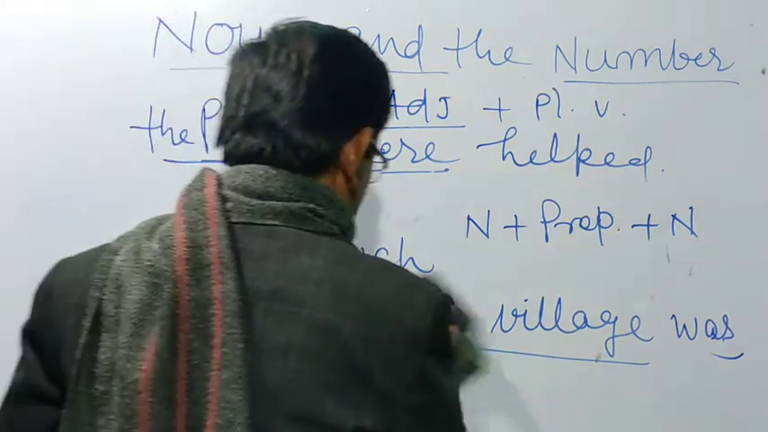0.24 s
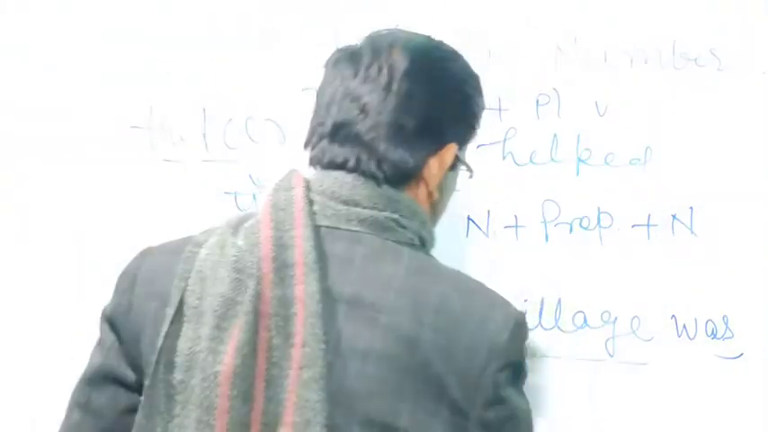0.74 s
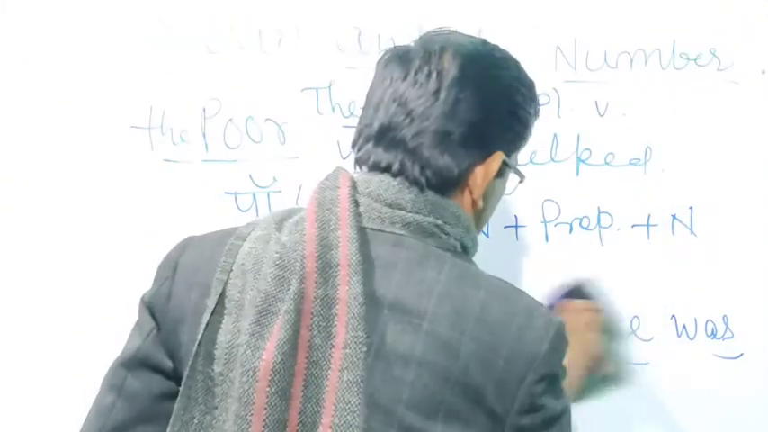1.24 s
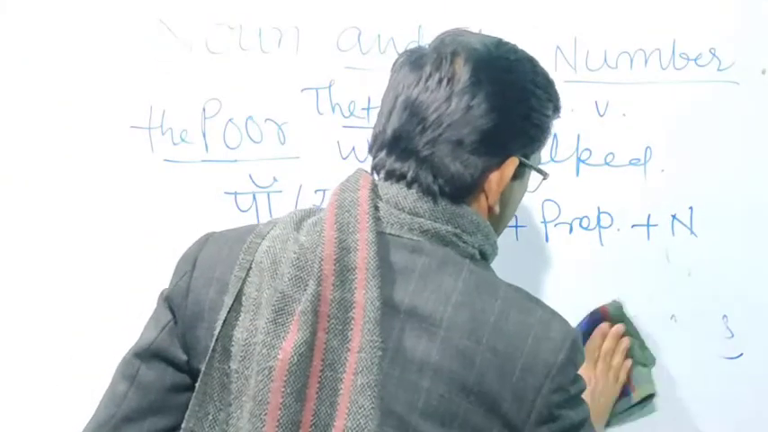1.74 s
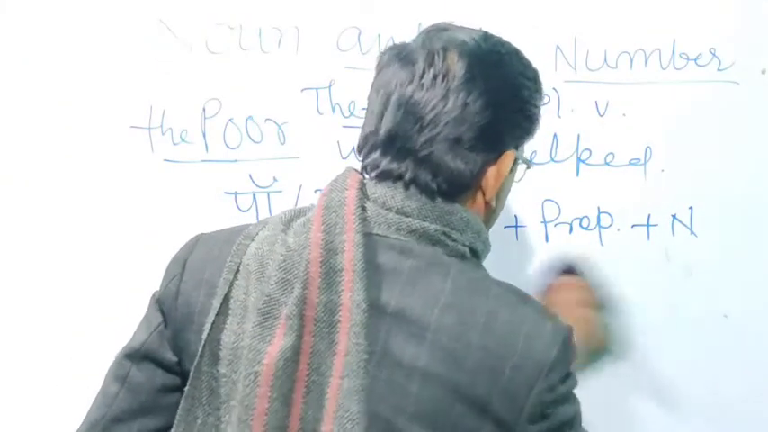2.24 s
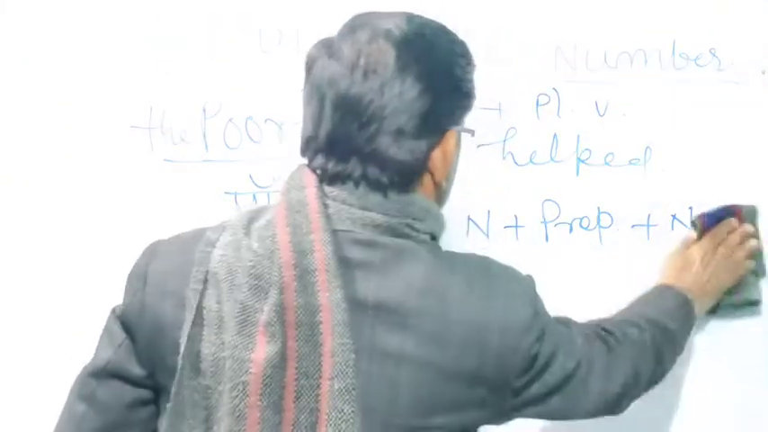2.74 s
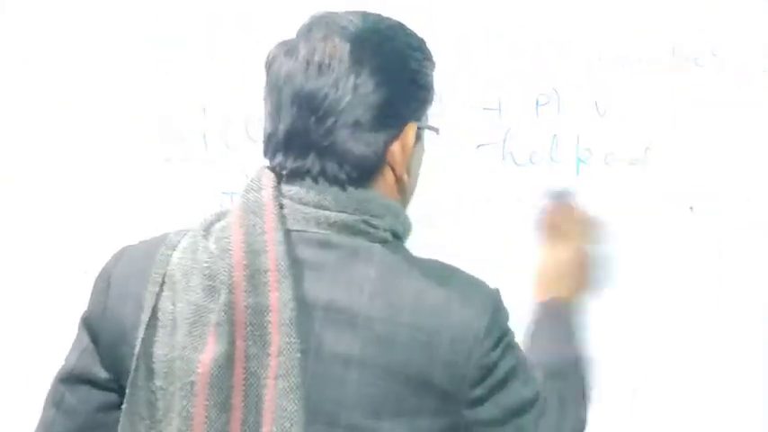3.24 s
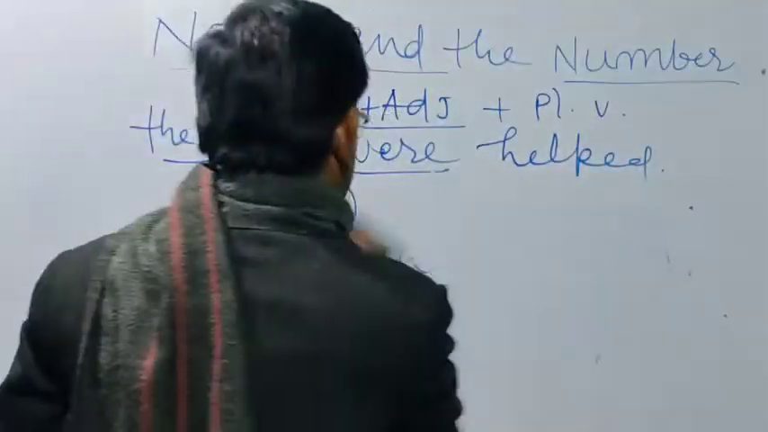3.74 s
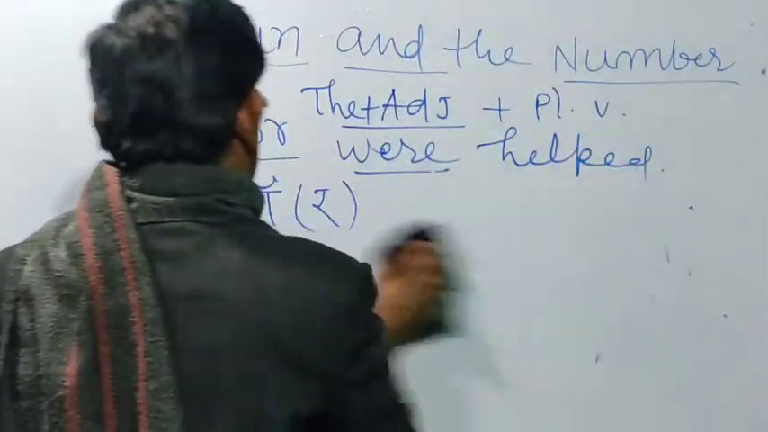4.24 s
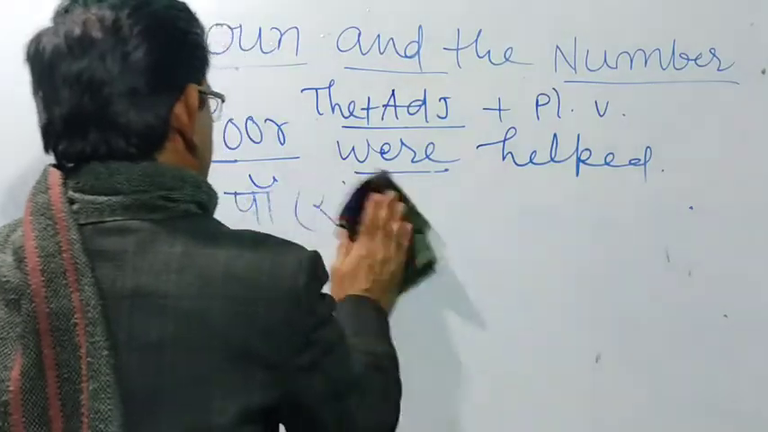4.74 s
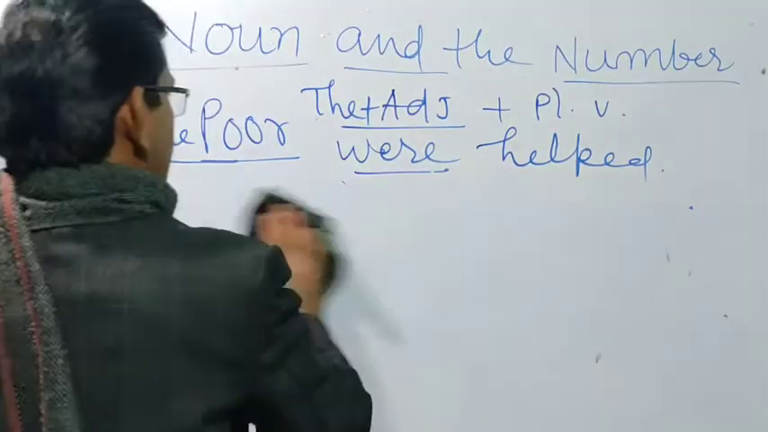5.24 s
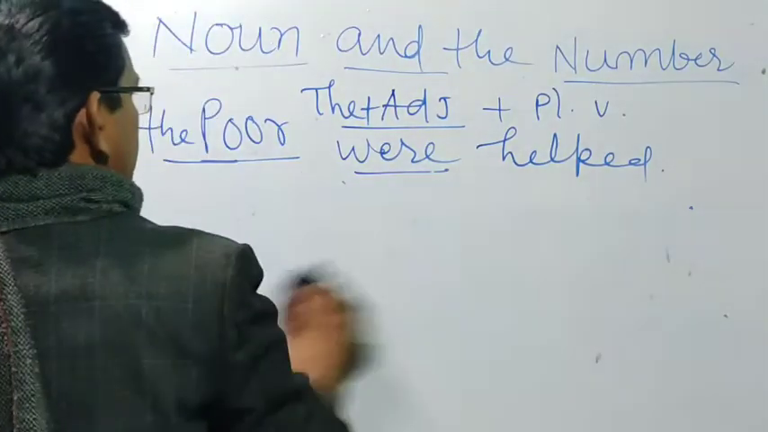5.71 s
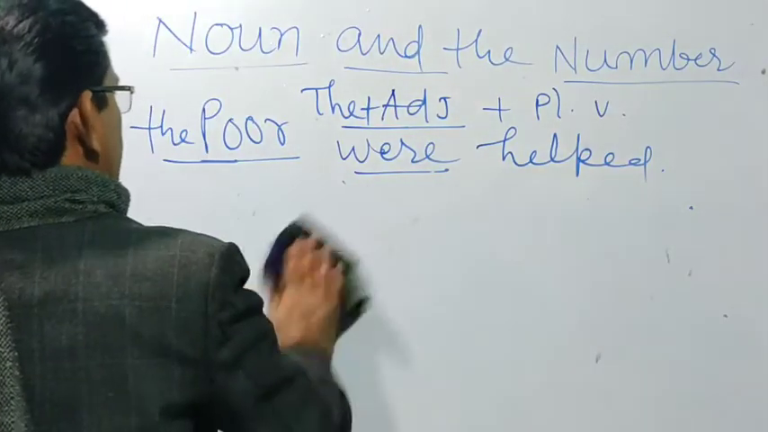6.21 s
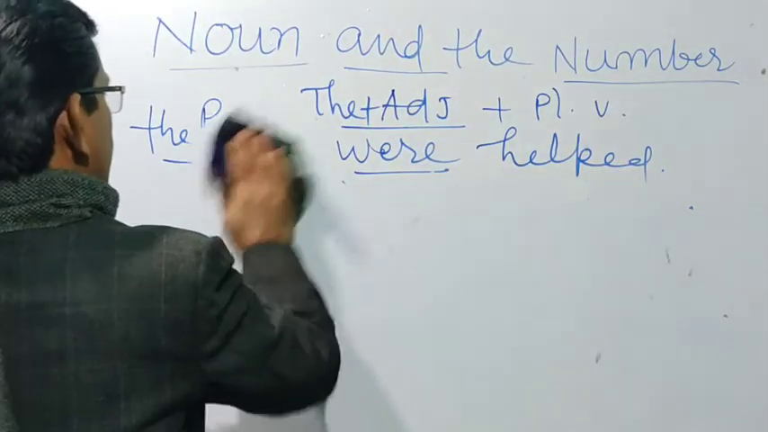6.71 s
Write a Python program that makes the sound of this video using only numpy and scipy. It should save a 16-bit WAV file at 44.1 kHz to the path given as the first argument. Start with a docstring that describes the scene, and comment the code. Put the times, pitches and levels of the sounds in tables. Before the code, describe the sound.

In a quiet room, a small microphone worn on the wiper's jacket hears a felt eraser scrubbing a whiteboard. From 0 to 1 seconds the strokes are short and quick, about six or seven per second, dry hisses over a hollow mid-pitched scrape, with light raps near 0.15, 0.3 and 0.6. Around 1.2 the felt catches in a brief low groaning judder, with further knocks to 1.5; a tiny very high squeak follows at 1.75. From 2 to 4 the strokes lengthen to roughly a third of a second, with a stronger scuff at 3.05, a cluster of thuds around 3.4 and a firm scrape near 3.7. A hard knock and thud land at 4.45, a sharp grit tick at 4.7. A faint broken tone rises far off from 5 to 5.7. Lighter wiping, a knock at 6.1 and a faint hum lead to the end at 7, still rubbing, with deep cloth rumble and air sway throughout.

```python
"""Felt eraser on a whiteboard

A felt eraser scrubs to and fro, heard by a small microphone on the wiper's jacket. Fibre slips are random
impulses that hiss with the stroke; coarser slips and knocks excite resonances of the panel. Bands of noise
swell and fade as scuffs of the felt and faint hums. The jacket rumbles and sways against the capsule.
Brief groans, a judder, a squeak and grit ticks are added, and a faint tone rises far off over the shaped
noise of a quiet room."""
import sys
import numpy as np
from scipy import signal
from scipy.fft import rfft, irfft, next_fast_len
from scipy.io import wavfile
from scipy.ndimage import uniform_filter1d

SR = 44100
rng = np.random.default_rng(int(sys.argv[2]) if len(sys.argv) > 2 else 0)


def master(y):
    """Save y as 16-bit WAV."""
    cut = np.clip(np.atleast_2d(y).T, -1, 1)
    pcm = np.round(cut * 32767)  # scale
    wavfile.write(sys.argv[1], SR, pcm.astype(np.int16))


N = 307377


def undb(db):
    """Decibel law: amplitude ratio from level."""
    return 10 ** (np.asarray(db) / 20)


def level(x, db):
    """Mean-square normalisation: scale to an rms level over the whole signal."""
    return x * undb(db) / np.sqrt(np.mean(x ** 2))


def seconds():
    """Uniform sampling: the time of every sample."""
    return np.arange(N) / SR


def curve(table):
    """Linear interpolation: columns of a (time, values...) table as sample-rate curves."""
    s, *columns = np.transpose(table)
    return [np.interp(seconds(), s, column) for column in columns]


def colour(x, points):
    """Spectral shaping: weight the spectrum by (frequency, gain) points on a log axis."""
    points_hz, points_db = np.transpose(points)
    size = next_fast_len(N)
    f = np.maximum(np.fft.rfftfreq(size, 1 / SR), .5)
    gain_db = np.interp(np.log(f), np.log(points_hz), points_db, left=-60)
    return irfft(rfft(x, size) * undb(gain_db), size)[:N]


def ring(x, modes):
    """Modal superposition: a sum of two-pole resonances, neighbours alternating in sign."""
    out = 0
    for k, (hz, width, db) in enumerate(modes):
        b, a = signal.iirpeak(min(hz, .45 * SR), hz / width, SR)
        out = out + (-1) ** k * undb(db) * signal.lfilter(b, a, x)
    return out


def walk(rate):
    """Smoothed random process: levels held 1 / rate s and averaged twice; spread near 1."""
    k = int(SR / rate)
    steps = np.repeat(rng.standard_normal(N // k + 1), k)
    return 1.3 * uniform_filter1d(uniform_filter1d(steps, k), k)[:N]


def grains(per_s, spread_db):
    """Shot noise: random impulses of very uneven size and either sign."""
    slips = rng.random(N) < per_s / SR
    return slips * rng.choice([-1., 1.], N) * undb(spread_db * rng.exponential(size=N))


# relative spectrum of the quiet room: (frequency [Hz], density [dB per Hz])
ROOM_SPECTRUM = [(60, 0), (200, -6), (350, -14), (1000, -18), (2500, -24), (6000, -28), (15500, -30)]
ROOM_DB = -65  # rms


def room():
    """Stationary noise: steady Gaussian noise shaped to the room's spectrum."""
    return level(colour(rng.standard_normal(N), ROOM_SPECTRUM), ROOM_DB)


# cloth rumble: (time [s], deep level [dB], low level [dB], upper level [dB])
RUMBLE = [(0.0, -53, -65, -67), (0.04, -47, -54.5, -54.5), (0.49, -49.5, -56.5, -57.5),
          (0.83, -52, -63.5, -63), (0.87, -55, -70, -61), (1.07, -50, -63, -61), (1.16, -51, -61, -62),
          (1.4, -47, -54, -51.5), (1.65, -44, -55.5, -51), (1.67, -51, -59, -56), (3.11, -49, -63, -60.5),
          (3.36, -41.5, -57, -53), (3.67, -51, -58, -57.5), (3.8, -40, -55, -54), (3.98, -50, -49.5, -57),
          (4.12, -54, -60, -61.5), (4.27, -55, -57.5, -61.5), (4.46, -45.5, -52, -51),
          (4.6, -53.5, -58, -60.5), (4.83, -50, -68, -58), (4.95, -63, -64, -68), (5.01, -46.5, -57, -60),
          (5.59, -57.5, -72, -63.5), (5.69, -46.5, -55, -53.5), (6.0, -56, -63, -61),
          (6.13, -43.5, -62, -58.5), (6.39, -54.5, -63.5, -63.5), (6.97, -50, -64, -60)]
# resonances of cloth and body, also excited by the knocks: (frequency [Hz], width [Hz], relative gain [dB])
BODY_MODES = [(41.5, 36, -11), (94.3, 49, 2), (175, 27.4, 1.5), (305, 230, 1.5)]
# slow sway, before its random swing and a fixed +0.67 dB: (time [s], level [dB])
SWAY = [(0.0, -32.5), (0.06, -33.5), (1.4, -30.5), (2.17, -41), (2.39, -29), (2.85, -45), (3.43, -24),
        (3.47, -43), (3.8, -27), (4.6, -39.5), (5.03, -28), (5.47, -49.5), (5.67, -34), (6.64, -38.5),
        (6.74, -32), (6.97, -31)]
# relative spectrum of the sway: (frequency [Hz], density [dB per Hz])
SWAY_SPECTRUM = [(2, 17.5), (6, 17), (10, 21.5), (20, 4), (28, 2), (45, -24), (100, -50)]
SWAY_PER_S, SWAY_SPREAD_DB = 6, 1  # rate and spread of the random swing
CLOTH_TOP_HZ = 300  # where cloth rumble ends


def jacket():
    """Friction and air pressure: cloth drags in lumps near the capsule; the moving body pushes air on it."""
    lumps = grains(per_s=900, spread_db=1.2)
    cloth_filter = signal.butter(4, CLOTH_TOP_HZ, fs=SR, output="sos")
    bands = (BODY_MODES[:1], BODY_MODES[1:2], BODY_MODES[2:])  # deep, low, upper
    rumble = 0
    for modes, db in zip(bands, curve(RUMBLE)):
        wider = [(hz, 2 * width, 0) for hz, width, _ in modes]
        # a second resonance steepens the skirts of each band
        band = signal.sosfilt(cloth_filter, ring(ring(lumps, modes), wider))
        rumble = rumble + level(band, 0) * undb(db)
    air = level(colour(rng.standard_normal(N), SWAY_SPECTRUM), 0.67)
    sway_db = curve(SWAY)[0] + SWAY_SPREAD_DB * walk(SWAY_PER_S)
    return rumble + air * undb(sway_db)


# curvature of a level between turns (1 = evenly in dB, smaller = sooner up, later down)
HISS_RISE, HISS_FALL, SLIP_RISE, SLIP_FALL, TOP_RISE = .8, .8, .65, .85, 0.26
TURN_S, SHIFT_S = 0.007, 0.17  # rounding of the turn; glide of colour from stroke to stroke


def swell(share, rest_db, peak_at, peak_db, rise, fall, stroke):
    """Envelope of reciprocating motion: a level climbs from one turn to its peak, then falls to the next."""
    at = np.clip(peak_at, .05, .95)[stroke]
    up = share < at
    climb = (share / at) ** rise
    descent = (np.abs(1 - share) / (1 - at)) ** fall
    part = np.where(up, climb, descent)
    next_rest_db = np.append(rest_db[1:], rest_db[-1])
    rest = np.where(up, rest_db[stroke], next_rest_db[stroke])
    return uniform_filter1d(rest + (peak_db[stroke] - rest) * part, int(TURN_S * SR))


# strokes, each from a turn of the hand; hiss, top and slip levels are relative settings:
# (turn time [s], level change around the turn [dB], hiss at the turn [dB], fastest at [share of stroke],
#  hiss there [dB], top of the hiss [dB], slips at the turn [dB], hardest at [share of stroke],
#  slips there [dB], lean to upper modes [dB per octave])
STROKES = [(-0.05, 0, -60, .3, -63, -2, -48, 0.43, -61.5, 1.5),
           (0.11, 0.5, -61.5, 0.5, -58, -3, -57.5, 0.61, -55, -6),
           (0.29, 0, -62.5, 0.33, -61, -2, -59, 0.45, -55, -0.5),
           (0.44, 0.5, -63.5, 0.38, -59, -1, -64, 0.61, -54, -2),
           (0.605, -1, -61, .4, -61, -2, -61, 0.1, -53, -1.5),
           (0.74, -1, -61, 0.64, -58, -1, -64.5, 0.55, -53, 0),
           (0.96, -3.5, -58, 0.45, -59.5, -3, -63.5, 0.56, -53.5, 1.5),
           (1.095, -1, -60.5, 0.68, -57.5, 0.5, -67, 1, -50, -5),
           (1.29, -2, -62, .4, -59.5, -2, -52, 0.16, -52, 0),
           (1.42, -0.5, -61, 0.79, -55, 0.5, -54, 0.71, -51.5, -2.5),
           (1.68, -2, -60, 0.7, -59.5, 1, -63.5, 0.57, -54.5, 2.5),
           (1.865, -1.5, -62, 0.84, -53, 0, -58, 0.83, -52, 0),
           (2.1, -2, -61.5, 0.75, -58.5, 0, -64, 0.82, -53, 0),
           (2.428, -4, -63.5, .78, -56, -3, -66, .75, -51.5, -2),
           (2.83, 0, -60.5, 0.73, -56, -2, -63, 0.85, -52.5, -3.5),
           (3.203, -4, -60, 0.77, -56, -1, -59, 0.57, -50.5, 0.5),
           (3.498, -3.5, -63.5, 0.69, -57.5, -2.5, -73, 0.78, -46, -1.5),
           (3.933, -4, -65.5, .6, -57.5, -1, -61, .5, -51, 0),
           (4.22, -3, -64, .7, -57, -2, -66, .5, -53, 1),
           (4.58, -0.5, -62, 0.59, -56, -2.5, -58.5, 0.55, -52.5, 2.5),
           (4.89, -2, -65.5, 0.64, -58, -3, -64.5, 0.59, -54.5, -1.5),
           (5.195, -1, -61, 0.71, -60, -1.5, -64, 0.57, -59.5, -2),
           (5.43, 1, -65, 0.53, -57, -2, -66.5, 0.24, -54, 0.5),
           (5.93, -2.5, -61, 0.79, -59.5, -1, -56.5, 1, -57.5, -6.5),
           (6.165, 1.5, -60.5, 0.42, -58.5, 0, -61, 0.88, -58, -1.5),
           (6.37, 0, -63, 0.77, -56.5, -2.5, -63.5, 0.68, -60.5, -1),
           (6.72, -1, -59, 0.68, -57.5, -1, -60.5, 0.62, -60, -2),
           (6.89, 0.5, -61.5, .5, -55, 2, -62, .5, -52.5, -5.5)]
LAST_TURN_S = 7.08
TOP_LOSS_DB = -5.5  # slow felt is duller
TURN_LEAN_DB = -0.5  # change of lean at the turn, dB per octave
HALT_S, HALT_TOP_SHARE = 0.022, 1.1  # half-length at 1/e; share added again in the top of the hiss


def hand():
    """Kinematic control: hiss, its top, coarse slips and their modal lean follow stroke speed and pressure."""
    (turn, halt_db, rest_db, fast, fast_db, top_db,
     light_db, hard, hard_db, lean_db) = np.transpose(STROKES)
    t = seconds()
    progress = np.interp(t, np.append(turn, LAST_TURN_S), np.arange(len(turn) + 1))
    stroke = progress.astype(int)
    share = progress - stroke
    halts = sum(db * np.exp(-((t - s) / HALT_S) ** 2) for s, db in zip(turn, halt_db))
    flat = 0 * turn

    def glide(column):
        """Moving average: pass smoothly from stroke to stroke."""
        return uniform_filter1d(column[stroke], int(SHIFT_S * SR))

    hiss = swell(share, rest_db, fast, fast_db, HISS_RISE, HISS_FALL, stroke) + halts
    dulling = swell(share, flat + TOP_LOSS_DB, fast, flat, TOP_RISE, TOP_RISE, stroke)
    top = glide(top_db) + dulling + HALT_TOP_SHARE * halts
    slips = swell(share, light_db, hard, hard_db, SLIP_RISE, SLIP_FALL, stroke)
    turn_lean = swell(share, flat + TURN_LEAN_DB, hard, flat, SLIP_RISE, SLIP_FALL, stroke)
    return hiss, top, slips, glide(lean_db) + turn_lean


# relative spectrum of the fibre hiss: (frequency [Hz], density [dB per Hz])
FELT_SPECTRUM = [(600, -19), (1500, 0), (3000, -3), (5000, -7), (8500, -3.5), (10500, -3.5), (12500, -4),
                 (15500, -4.5)]
# modes of the panel, also excited by the knocks: (frequency [Hz], width [Hz], relative gain [dB])
PANEL_MODES = [(360, 145, -4.5), (545, 85, 2.5), (743, 122, 2), (1012, 228, 2.5), (1321, 333, 0),
               (2240, 1800, -10.5)]
# where the hand is on the board: (time [s], frequency that the place favours [Hz])
PLACE = [(0.0, 626), (2.3, 577), (2.55, 685), (3.3, 665), (3.7, 805), (4.4, 844), (4.9, 770), (5.6, 826),
         (6.4, 820), (6.97, 840)]
PLACE_DB, PLACE_OCTAVES = 5, .3  # gain at the favoured frequency; its reach


def eraser():
    """Friction-driven radiation: fine fibre slips hiss; coarser slips ring the panel's modes."""
    hiss_db, top_db, slip_db, lean_db = hand()
    fibres = level(colour(grains(per_s=20000, spread_db=2.0), FELT_SPECTRUM), 5.94)
    # the top of the hiss tilts with the angle of the felt
    low = signal.sosfilt(signal.butter(3, 10500, "low", fs=SR, output="sos"), fibres)
    top = signal.sosfilt(signal.butter(3, 10500, "high", fs=SR, output="sos"), fibres)
    hiss = undb(hiss_db + .6 * walk(30)) * (low + undb(top_db) * top)
    slips = grains(per_s=4000, spread_db=2.1) * undb(1.2 * walk(40))
    slips = signal.lfilter(*signal.butter(1, 4000, fs=SR), slips)  # the felt's give dulls them
    scale = np.std(ring(slips, PANEL_MODES))
    # the place on the board decides which modes speak most
    place_hz = curve(PLACE)[0]
    panel = 0
    for k, mode in enumerate(PANEL_MODES):
        octaves_off = np.log2(mode[0] / place_hz)
        place_db = PLACE_DB * np.exp(-(octaves_off / PLACE_OCTAVES) ** 2)
        favour_db = lean_db * np.log2(mode[0] / 800) + place_db
        panel = panel + (-1) ** k * undb(favour_db) * ring(slips, [mode])
    return hiss + undb(slip_db) * panel / scale


# bands of noise, scuffs of the felt and faint hums near 350 Hz; level is rms before the swell:
# (start [s], length [s], centre [Hz], width [Hz], level [dB])
NOISE_BANDS = [(0.094, 0.18, 790, 600, -62), (0.25, 0.067, 800, 600, -61), (4.004, 0.14, 1000, 600, -60),
               (1.22, 0.11, 1300, 1200, -55.5), (2.71, 0.08, 2940, 2200, -59.5),
               (3.046, 0.13, 730, 600, -46), (3.082, 0.043, 4000, 2500, -52.5),
               (3.631, 0.21, 610, 250, -54), (3.693, 0.16, 1350, 600, -53.5), (4.284, 0.14, 880, 348, -49),
               (4.65, 0.066, 8000, 6000, -55.5), (4.653, .13, 820, 350, -59),
               (4.782, 0.17, 342, 120, -58.5), (4.955, 0.083, 780, 250, -57), (5.27, 0.13, 686, 200, -62),
               (5.495, 0.049, 810, 250, -58), (6.026, 0.091, 1020, 450, -54), (6.153, 0.65, 365, 120, -61),
               (6.234, 0.2, 770, 130, -58)]


def scuffs_and_hums():
    """Resonant filtering of shot noise: each band of noise swells soon and fades."""
    out, impulses = 0, grains(per_s=4000, spread_db=1.8)
    for start, length, hz, width, db in NOISE_BANDS:
        share = np.clip((seconds() - start) / length, 0, 1)
        band = ring(ring(impulses, [(hz, width, 0)]), [(hz, 2 * width, 0)])
        out = out + np.sin(np.pi * share ** .6) * level(band, db)
    return out


def blow(rough, push_s, tail_s, tail_db, modes, hz, db):
    """Modal excitation by impact: a push, then a rattle that holds and stops; modes near hz are favoured."""
    t = np.arange(len(rough)) / SR
    near = [(f, width, gain_db - 8 * abs(np.log2(f / hz))) for f, width, gain_db in modes]
    push = np.exp(-t / push_s)
    rattle = undb(tail_db) * np.exp(-(t / tail_s) ** 3)
    out = ring(rough * (push + rattle), near)
    return out * undb(db) * np.sqrt(2) / np.abs(out).max()  # the peak is 3 dB above db


# knocks of the eraser; levels are 3 dB below the peak:
# (time [s], rap level [dB], pitch of the spot [Hz], rap scuffs on for [s],
#  thud level [dB], thud pitch [Hz], thud shakes on for [s])
KNOCKS = [(0.111, -47, 1400, 0.0018, -39.5, 93, 0.012), (0.145, -36.5, 900, 0.0044, -49, 94, 0.018),
          (0.277, -37, 637, 0.015, -53, 91, .02), (0.59, -36.5, 825, 0.017, -59, 94.2, .02),
          (0.922, -48.5, 999, .012, -52, 163, 0.03), (1.208, -48, 471, 0.015, -44.5, 151, 0.053),
          (1.448, -41.5, 610, 0.0071, -40.5, 222, 0.037), (1.544, -36.5, 595, 0.018, -43.5, 347, .02),
          (1.961, -41.5, 543, 0.017, -47, 92, 0.037), (2.224, -36, 560, 0.026, -41.5, 143, 0.047),
          (2.255, -49, 540, .01, -46, 188, 0.034), (3.047, -45, 970, 0.028, -58, 91.5, 0.024),
          (3.324, -44, 700, 0.024, -41, 91, 0.026), (3.365, -44, 700, 0.021, -41.5, 171, 0.02),
          (3.41, -42, 530, 0.014, -35, 197, 0.023), (3.442, -47, 530, 0.016, -42.5, 186, 0.057),
          (3.785, -35.5, 640, 0.031, -47, 225, 0.015), (3.808, -43, 960, 0.018, -37, 200, 0.024),
          (4.069, -60, 528, .012, -40.5, 102, 0.033), (4.446, -35, 800, 0.016, -33, 174, 0.025),
          (5.095, -48, 533, 0.013, -43, 179, 0.018), (5.692, -45, 705, 0.026, -42, 210, 0.03),
          (6.124, -37, 640, 0.007, -36.5, 185, 0.022), (6.577, -61, 549, .01, -50, 91.5, 0.017)]
THUD_NOTE_DB, THUD_HOLD_DB = 0, 0  # clear note against the rough jolt; its hold against the push


def knocks():
    """Impact and structure-borne sound: the eraser's back raps the panel; the jolt thuds at the jacket."""
    out, t = np.zeros(N), np.arange(8192) / SR
    noise = rng.standard_normal((len(KNOCKS), 2, 8192))
    cloth_filter = signal.butter(4, CLOTH_TOP_HZ, fs=SR)
    for knock, (fine, coarse) in zip(KNOCKS, noise):
        s, rap_db, rap_hz, rap_s, thud_db, thud_hz, thud_s = knock
        rap = blow(fine, 0.003, rap_s, -1.5, PANEL_MODES, rap_hz, rap_db)
        # cloth and body soften the jolt
        soft = signal.lfilter(*cloth_filter, coarse)
        note = undb(THUD_NOTE_DB) * np.sqrt(2) * np.sin(2 * np.pi * thud_hz * t)
        jolt = soft / np.std(soft) - note
        thud = blow(jolt, 0.0032, thud_s, THUD_HOLD_DB, BODY_MODES, thud_hz, thud_db)
        i = int(s * SR)
        out[i:i + 8192] += (rap + thud)[:N - i]
    return out


# wavering notes of the panel around the judder; level is rms before swell and flutter:
# (start [s], length [s], first pitch [Hz], last pitch [Hz], level [dB])
GROANS = [(1.2, .1, 472, 482, -52), (1.255, .11, 520, 500, -55), (1.25, .14, 275, 252, -49),
          (1.43, .12, 258, 255, -56)]


def groans():
    """Frequency modulation: each note swells fast, slides a little with a random waver, and fades."""
    out = 0
    for start, length, first_hz, last_hz, db in GROANS:
        share = np.clip((seconds() - start) / length, 0, 1)
        hz = (first_hz + (last_hz - first_hz) * share) * (1 + .012 * walk(60))
        note = np.sin(2 * np.pi * np.cumsum(hz) / SR)
        out = out + np.sin(np.pi * share ** .7) * np.sqrt(2) * undb(db + 2 * walk(40)) * note
    return out


# one judder under a hard push; level is rms before the push: (start [s], length [s], level [dB])
JUDDER = (1.205, 0.28, -47.5)
# its ringing: (frequency [Hz], width [Hz], relative gain [dB])
JUDDER_MODES = [(250, 18, -4.5), (354, 52, -5.5), (483, 41, -3.5), (1110, 930, -27)]


def judder():
    """Stick-slip resonance: a run of coarse slips sets in within 20 ms and dies away."""
    start, length, db = JUDDER
    t = seconds() - start
    push = np.clip(t / 0.02, 0, 1) * np.exp(-(np.maximum(t, 0) / length) ** 2 * 2.5)
    return push * level(ring(grains(per_s=1000, spread_db=3.0), JUDDER_MODES), db)


# one squeak of the felt; level is rms before the swell: (start [s], length [s], pitch [Hz], level [dB])
SQUEAK = (1.735, .085, 11270, -62)


def squeak():
    """Narrow-band resonance: noise in a 70 Hz band is a brief, unsteady whistle of felt on the gloss."""
    start, length, hz, db = SQUEAK
    arc = np.sin(np.pi * np.clip((seconds() - start) / length, 0, 1))
    return arc * level(ring(rng.standard_normal(N), [(hz, 70, 0)]), db)


# grit under the felt; level is the amplitude before decay: (time [s], level [dB], pitch [Hz])
TICKS = [(2.247, -34.5, 5250), (2.743, -43, 3200), (3.093, -39, 3230), (4.6763, -35, 7150),
         (6.175, -41, 2950)]


def ticks():
    """Damped oscillation: each bit of grit rings for a millisecond or two."""
    out = np.zeros(N)
    t = np.arange(512) / SR
    for s, db, hz in TICKS:
        i = int(s * SR)
        out[i:i + 512] += undb(db) * np.sin(2 * np.pi * hz * t) * np.exp(-t / 0.00051)
    return out


# faint far tone; pitch and level waver around these: (time [s], frequency [Hz], level [dB])
TONE = [(4.95, 372, -66), (5.0, 374, -64), (5.07, 376, -71), (5.11, 380, -60), (5.18, 382, -62),
        (5.25, 384, -78), (5.31, 390, -60), (5.365, 387, -74), (5.41, 384, -63), (5.45, 388, -68),
        (5.5, 402, -63), (5.53, 410, -74), (5.58, 418, -63), (5.66, 410, -63)]


def far_tone():
    """Harmonic synthesis: a faint broken tone with a weak octave and a random waver."""
    hz, db = curve(TONE)
    t = seconds()
    on = np.clip(np.minimum(t - TONE[0][0], TONE[-1][0] - t) / 0.0071, 0, 1)
    phase = 2 * np.pi * np.cumsum(hz * (1 + .013 * walk(40))) / SR
    note = np.sin(phase) + undb(-13) * np.sin(2 * phase)
    return on * np.sqrt(2) * undb(db + 3 * walk(25)) * note


def scene():
    """Linear superposition: all sources add at the capsule."""
    background = room()
    board = eraser() + knocks() + ticks() + judder() + groans() + scuffs_and_hums() + squeak()
    return (board + jacket() + far_tone() + background)[None]


TOP_HZ = 15380


def record(dry):
    """Band limitation: the recorder cuts the top with a steep low-pass filter."""
    return signal.sosfilt(signal.ellip(20, .2, 90, TOP_HZ, fs=SR, output="sos"), dry)


dry = scene()
out = record(dry)
master(out)
```